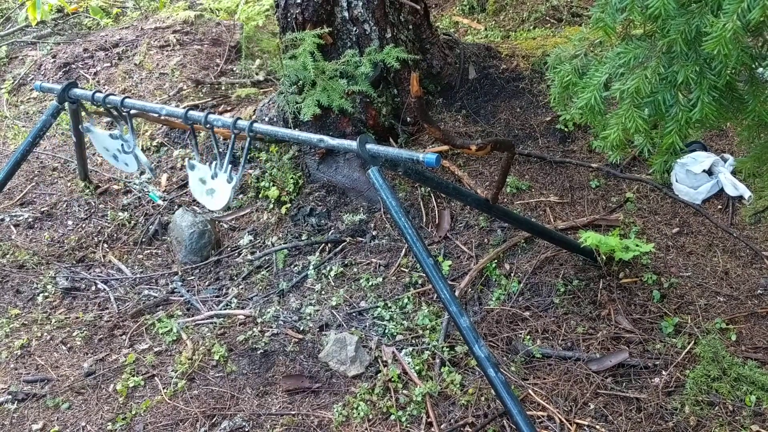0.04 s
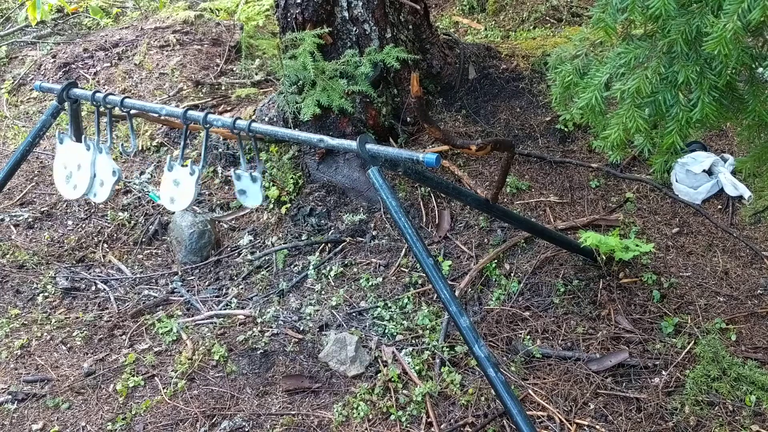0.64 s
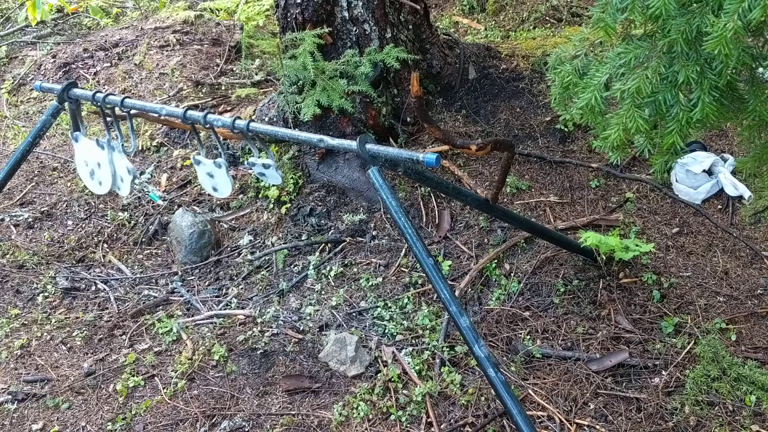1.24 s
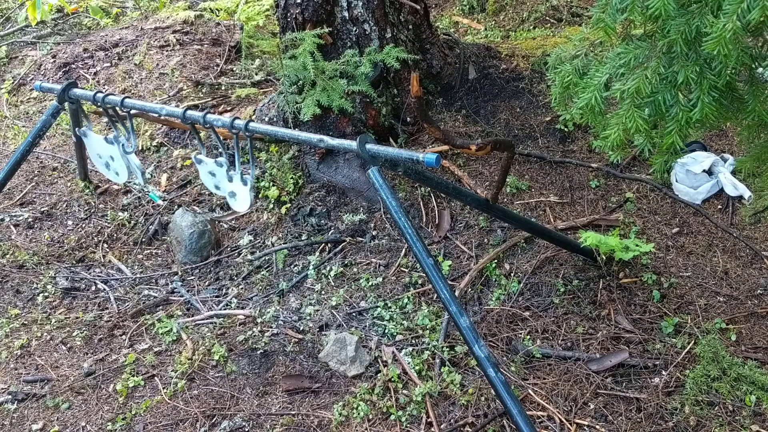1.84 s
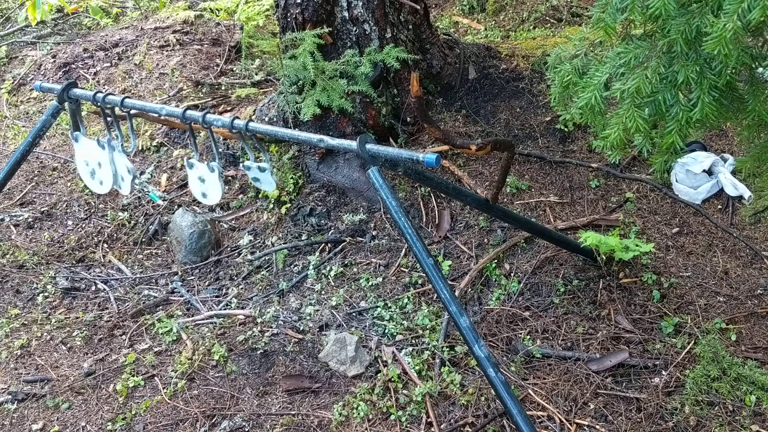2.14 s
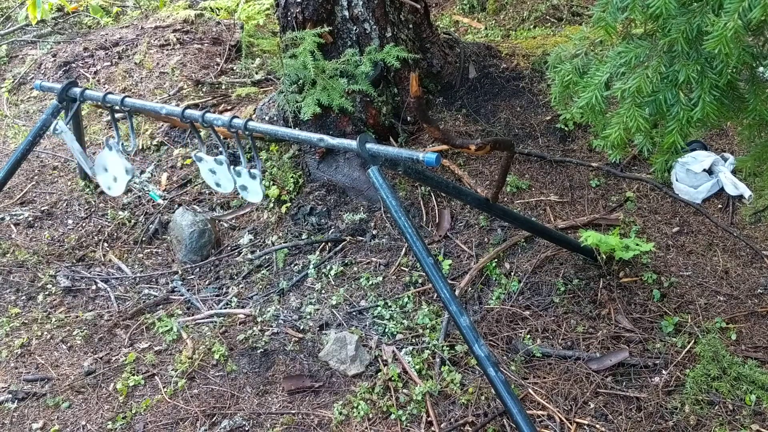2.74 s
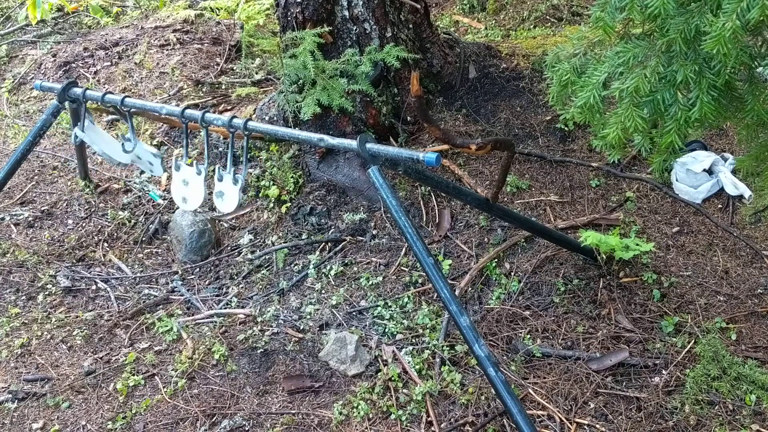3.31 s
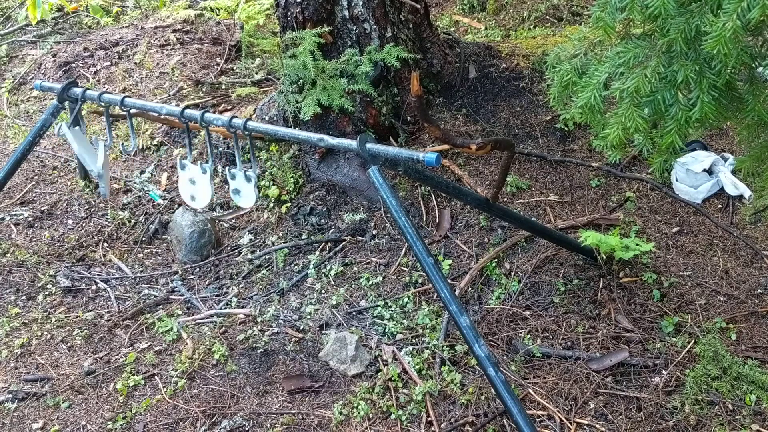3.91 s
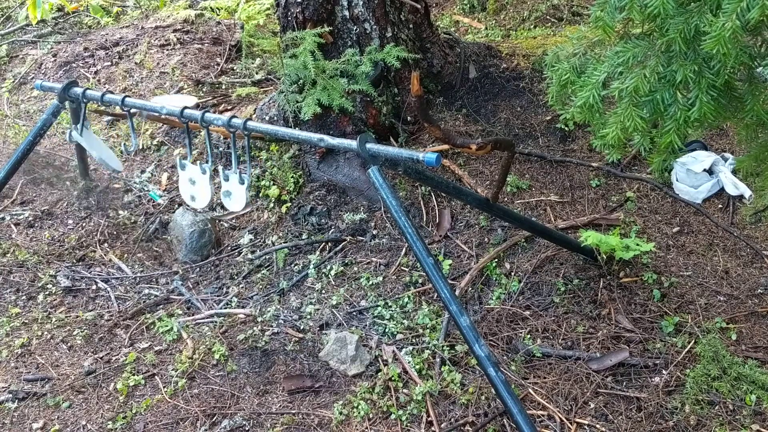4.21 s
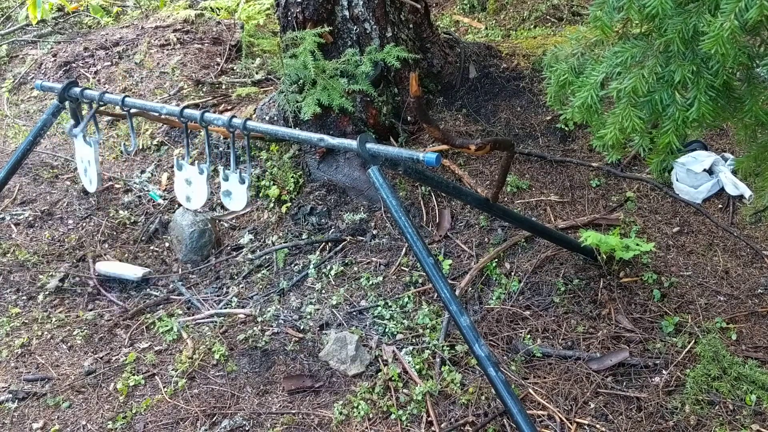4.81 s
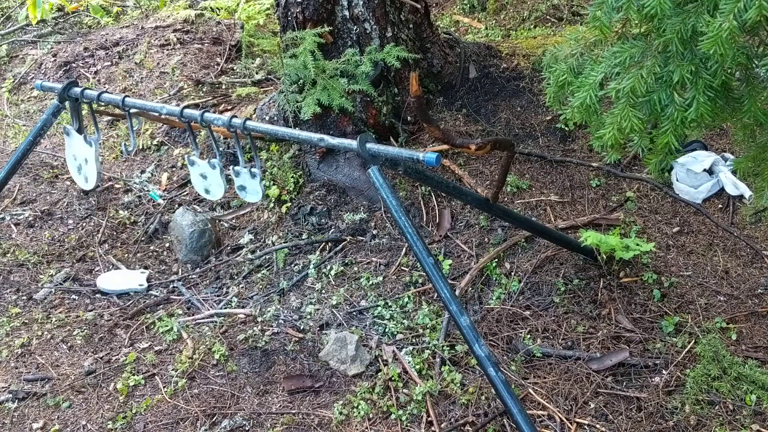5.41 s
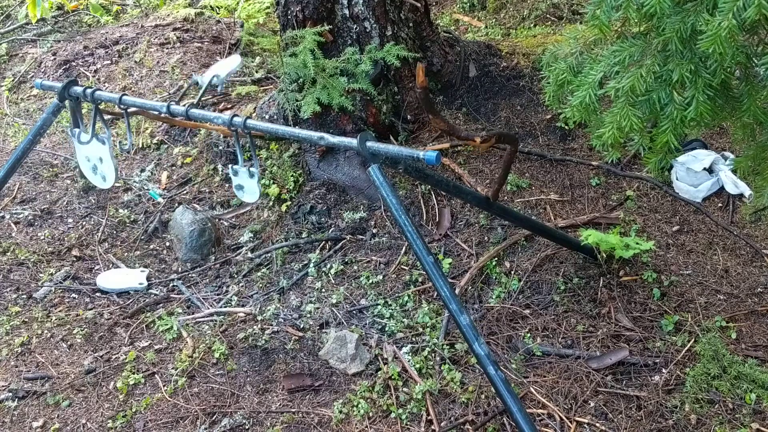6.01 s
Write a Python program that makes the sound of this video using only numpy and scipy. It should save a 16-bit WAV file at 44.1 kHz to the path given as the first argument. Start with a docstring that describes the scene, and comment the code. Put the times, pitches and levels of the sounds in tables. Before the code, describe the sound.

The sound opens on the echo of a gunshot fading through a forest, with a faint steady hush of air and a few tiny metal taps. At about 2.4 seconds a sharp shot overloads the microphone, and a nearby hanging steel plate rings with a high, fluttering ping, quickly damped. A long echo rolls through the trees while hangers clink on their bar around 2.9 and 3.1 seconds, then more faintly. A second shot cracks at 4.3 seconds with another ping and echo. Plates knock together at 4.6, and steel drops on the soil with a soft thud at 4.9. More light clinks follow. The third shot, at 5.6 seconds, brings the loudest ring, another thud and plates clanking around 5.9 as the echo carries on to the end. Faint ticks of falling bark and a dull distant thump trail the earlier shots.

```python
"""Four gunshots in a forest, heard beside a rack of hanging steel plates.
The first fires just before the start: the trees echo it, a far slope returns one dull thump, hangers
tap, bits of bark patter down. Three more blasts overload the microphone; each bullet sets a plate
ringing and spinning until its hanger checks it. From the third shot on, plates also strike each other
and steel drops on the soil. A faint hush of air lies under it all."""
import sys
import numpy as np
from scipy import signal
from scipy.fft import rfft, irfft, next_fast_len
from scipy.io import wavfile

SR = 44100
rng = np.random.default_rng(int(sys.argv[2]) if len(sys.argv) > 2 else 0)


def wav_out(sig):
    """Save sig, one row per channel (or a flat mono array), as 16-bit PCM at SR to the path in sys.argv[1]."""
    wavfile.write(sys.argv[1], SR, np.round(np.clip(np.atleast_2d(sig).T, -1, 1) * 32767).astype(np.int16))


N = 271215

# shots: t/s, blast level/dB, blast length/factor, shock level/dB, echo level/dB
GUNSHOTS = [(-.194, -14, 0.89, -18, 1), (2.378, -3.5, 1.09, 3, 1.5), (4.2639, -1, 0.64, 5, 2),
            (5.632, 0.5, 0.58, -1.5, 0.5)]
# blast scattered by ground and near trunks: f/Hz, density/dB, t60/s at length 1
BLAST_BANDS = [(30, -14, 0.14), (79.2, -2, 0.087), (250, -6, 0.12), (600, -0.5, 0.065), (1197, -5, 0.11),
               (2200, -6, 0.11), (4850, -15, 0.24), (10000, -15, 0.1), (16000, -29, 0.22)]
# shock paths, direct and via near trunks: delay/s, level/dB, push/s
SHOCK_PATHS = [(0, 19.5, 0.00053), (.0017, -2, 0.001), (.0058, 6.5, .0025), (0.0142, -2.5, 0.0045)]
# forest echo, treble absorbed by air: f/Hz, density/dB, t60/s before the envelope
FOREST_BANDS = [(30.36, -36, 20), (90, -29, 20), (270, -22, 35), (516, -15.5, 30), (1000, -4.5, 15.8),
                (1830, 2.5, 4.65), (4040, -2.5, 2.305), (6170, 0, 1.33), (9000, 2, 0.76),
                (11960, -10, 0.83), (16000, -23, .65)]
# plate modes, three rows each: f/Hz, level/dB, t60/s
MODES_A = [
    [2051, 2650, 3440, 4882, 5550, 6888, 8037, 8696, 10076, 10980, 11516, 13310, 13770, 15350],
    [-16, 3, -17, -8, -3.5, -8, -12, -7, -7, -13, -9.5, -16, -16, -27],
    [1.0, .36, 1.0, .8, 1.1, .55, .8, .75, .9, .7, .65, .7, .6, 1.2],
]
MODES_B = [
    [2930, 3445, 5233, 6580, 6939, 7355, 9292, 9814, 11160, 12240, 12540, 13520, 15250],
    [-4, -4, -3, 0, -17, -3, -10, -19, -17, -16, -15, -20, -17],
    [.7, 1.2, .5, .85, 1.5, 1.1, .9, .6, .75, .5, .95, .4, .75],
]
MODES_C = [
    [4242, 5222, 5268, 7252, 9483, 10581, 10618, 11600, 12630, 13150, 14700],
    [-15, 0, -6, -9, -12, -9, -10, -21, -20, -21, -23],
    [.7, 1.0, .7, .7, .5, .6, .5, .4, .4, .5, .3],
]
# bullets on plates A, B, C: t/s, level/dB, half turn/s, t of hanger check/s, loss at check/dB
BULLET_HITS = [(2.379, -4, .145, 2.622, 23), (4.265, -7.5, 0.15, 4.375, 7.5),
               (5.632, 1.5, 0.106, 5.733, 17)]
# hanger and cross bar modes: f/Hz, level/dB, t60/s
HANGER_MODES = [(2100, -6.5, 0.09), (2950, -16, 0.093), (3110, -10, 0.35), (4250, -4, 0.093),
                (5250, -2, 0.018), (6500, -28, 0.099), (6800, -15, 0.34), (6760, -4, .14),
                (7410, -16.5, 0.24), (7970, -1.5, 0.12), (8180, -15, 0.067), (8800, -11.5, 0.52),
                (10000, -6, 0.14), (11600, -14.5, 0.22), (12070, -18, 0.1), (13490, -23.5, .12)]
# hanger on cross bar: t/s, level/dB, main mode f/Hz, mode level re knock/dB
HANGER_KNOCKS = [(1.443, -47.5, 2980, -7), (1.9012, -45, 3030, 1), (2.915, -31.5, 2980, -2),
                 (3.146, -30, 4120, -5), (3.617, -47.5, 3030, 2), (3.6944, -50, 4960, 3),
                 (3.8995, -45, 3080, 2), (3.97, -44, 3050, -4), (4.1594, -33.5, 3100, -4),
                 (5.228, -35.5, 3140, 6), (5.4325, -34.5, 5440, 2)]
# plate on plate, one row per singing mode: t/s, knock level/dB, f/Hz, mode level/dB, t60/s
PLATE_PINGS = [(4.569, -25, 6970, -20.5, 0.17), (5.334, -33, 6930, -26.5, 0.22),
               (5.334, -48, 13490, -46, .22), (5.335, -37.5, 5550, -34, 0.25),
               (5.914, -22, 4262, -10, 0.064), (5.975, -27, 7210, -31.5, 0.41),
               (6.024, -27, 6380, -32.5, 0.22)]
# steel on soil: t/s, thud level/dB, f/Hz, snap level/dB
STEEL_LANDINGS = [(4.893, -30.5, 109, -25), (4.908, -20.5, 107.5, -23), (4.937, -35, 67, -40),
                  (5.155, -47, 147, -43.5), (5.686, -16.5, 163, -25), (5.712, -24, 133, -35)]
# hush of the woods: f/Hz, density/dB
AIR_SPECTRUM = [(18, -40), (30, -2), (171, -2.5), (216, -4), (267, -5.5), (794, -3.5), (859, -2.5),
                (2770, -17.5), (15000, -24.5)]

BAND_LIMIT_HZ = 16200
HANGER_T60_S = .075


def muzzle_blast(db, length, shock_db, scatter_db=9, delay_spread=.23):
    """Shock wave, first bounces and dense scatter."""
    t = clock(.5)
    sound = gain_of(scatter_db + db) * scatter(BLAST_BANDS, t / length)
    for delay_s, path_db, push_s in SHOCK_PATHS:
        arrival_s = delay_s * (1 + delay_spread * rng.uniform(-1, 1))
        add(sound, arrival_s, -gain_of(shock_db + path_db) * shock(t, push_s))
    return sound


def shock(t, push_s):
    """Blast wave: sudden push, longer suction."""
    return (1 - t / push_s) * np.exp(-t / push_s)


def forest_echo(db, trim_db=-20, near_s=.07, crest_s=.43, rise_db_per_s=3.5, fade_db_per_s=16):
    """Near trunks answer at once; the clumped stand behind swells, then fades with range."""
    t = clock(3)
    near_db = 16.5 * np.exp(-t / near_s)
    swell_db = np.minimum(rise_db_per_s * (t - crest_s), -fade_db_per_s * (t - crest_s))
    clumps_db = .51 * wander(t, top_hz=45)
    return gain_of(db + trim_db + near_db + swell_db + clumps_db) * scatter(FOREST_BANDS, t)


def far_slope(db, loss_db=24):
    """One distant reflection of the blast; only bass survives."""
    return -gain_of(db - loss_db) * band(shock(clock(.1), push_s=.0029), 48, 300, order=3)


def plate_ring(modes, db, half_turn_s, free_s, loss_db,
               doppler=.002, split_hz=28, twin_db=-8, lobes_db=3, edge_on_db=-9.5, check_s=.01):
    """A struck plate rings and spins, loudest face-on, until its hanger damps it."""
    t = clock(1.2)
    ring = np.zeros(len(t))
    for hz, mode_db, t60_s in zip(*modes):
        bent_t = t + doppler * np.cumsum(wander(t, top_hz=25)) / SR  # motion bends the pitch
        pair = mode(bent_t, hz, t60_s)
        twin_hz = hz + split_hz * rng.uniform(1, 1.8)  # dents split the mode: beats
        pair += gain_of(twin_db) * mode(bent_t, twin_hz, t60_s)
        ring += gain_of(mode_db + lobes_db * wander(t, top_hz=25)) * pair  # lobes sweep past
    facing = np.hypot(np.sin(np.pi * t / half_turn_s), gain_of(edge_on_db))
    checked = np.clip((t - free_s) / check_s, 0, 1)
    return ring * facing * gain_of(db - loss_db * checked)


def plate_echo(ring, wet_db=-17, fade_s=.15):
    """Near trees return the ring as a fluttering tail."""
    t = clock(1)
    tail = scatter(FOREST_BANDS, t) * np.exp(-t / fade_s)
    return gain_of(wet_db) * signal.oaconvolve(ring, tail / np.linalg.norm(tail))[:N]


def clank(db, main_hz, main_db, main_t60_s, spread_db=4, detune=.0093, scrape_s=.037, rise_s=.0004,
          firm_db=-30, firm_cutoff_hz=10000, db_per_octave=11.5):
    """Steel on steel: a short scrape, and modes whose mix and pitch depend on the spot struck."""
    t = clock(.35)
    ring = np.zeros(len(t))
    for hz, mode_db, t60_s in HANGER_MODES:
        gain = gain_of(mode_db + spread_db * rng.standard_normal())
        ring += gain * mode(t, hz * (1 + detune * rng.uniform(-.85, 1)), t60_s)
    rack_hz = np.geomspace(1300, 9500, 22)
    clack = sum(mode(t, hz * rng.uniform(.88, 1.06), t60_s=.11) for hz in rack_hz)
    scrape = band(rng.standard_normal(len(t)), 1200, 9400, order=3) * np.exp(-t / scrape_s)
    knock = ring / 2 + gain_of(-12) * clack + gain_of(-5) * scrape
    # softer knock: longer contact, less treble
    cutoff_hz = np.clip(firm_cutoff_hz * 2 ** ((db - firm_db) / db_per_octave), 2000, BAND_LIMIT_HZ)
    knock = signal.lfilter(*signal.butter(1, cutoff_hz, fs=SR), knock)
    tone = gain_of(main_db) * mode(t, main_hz, main_t60_s)
    return (gain_of(db) * knock + tone) * (1 - np.exp(-t / rise_s))


def landing(thud_db, thud_hz, snap_db, thud_s=.0096, snap_s=.0072):
    """Steel lands: soft soil thuds, needles and twigs snap."""
    t = clock(.15)
    grit, soil = rng.standard_normal((2, len(t)))
    push = np.sin(2 * np.pi * thud_hz * t) + gain_of(-8) * unit_rms(band(soil, 59, 285))
    thud = 2 * push * t / thud_s * np.exp(1 - 2 * t / thud_s)
    snap = band(grit, 3300, 8700) * np.exp(-t / snap_s)
    return gain_of(thud_db) * thud + gain_of(snap_db) * snap


def hanger_rattle(count=6, first_s=.29, gap_s=.33, main_hz=3050, fade_db_per_s=28, floor_db=-57.5):
    """Swinging hangers tap unevenly after a shot, fading to a floor."""
    sound = np.zeros(3 * SR)
    for k, (late, spot) in enumerate(rng.random((count, 2)) - .5):
        at_s = first_s + gap_s * (k + late)
        db = max(-40 - fade_db_per_s * at_s, floor_db)
        add(sound, at_s, clank(db, main_hz * (1 + .25 * spot), db, HANGER_T60_S))
    return sound


def bark_patter(count=4, flight_s=.8, spread_s=.5, db=-50, spread_db=7, tick_s=.0023):
    """Bark thrown up by a shot ticks down on dry needles."""
    sound, t = np.zeros(2 * SR), clock(.05)
    for late, smallness in rng.random((count, 2)):
        tick = band(rng.standard_normal(len(t)), 3200, 9400) * np.exp(-t / tick_s)
        add(sound, flight_s + spread_s * late, gain_of(db - spread_db * smallness) * tick)
    return sound


def still_air(rms_db=-64):
    """Faint steady hush of the woods."""
    hz, db = np.transpose(AIR_SPECTRUM)
    colour = gain_of(np.interp(np.log(np.fft.rfftfreq(N, 1 / SR) + 1), np.log(hz), db))
    return gain_of(rms_db) * unit_rms(irfft(rfft(rng.standard_normal(N)) * colour, N))


def scatter(bands, t):
    """Dense reflections: noise starting at rms 1, each band with its own decay."""
    hz, db, t60s_s = np.transpose(bands)
    size = next_fast_len(len(t))
    log_hz = np.log(np.fft.rfftfreq(size, 1 / SR) + 1)
    spectrum = rfft(rng.standard_normal(size)) * gain_of(np.interp(log_hz, np.log(hz), db))
    spectrum /= irfft(spectrum, size).std()
    shares = [np.interp(log_hz, np.log(hz), row) for row in np.eye(len(hz))]
    return sum(irfft(spectrum * share, size)[:len(t)] * np.exp(-np.log(1000) * t / t60_s)
               for share, t60_s in zip(shares, t60s_s))


def mode(t, hz, t60_s):
    """Decaying partial, random phase."""
    return np.sin(2 * np.pi * (hz * t + rng.random())) * np.exp(-np.log(1000) * t / t60_s)


def wander(t, top_hz):
    """Smooth random curve, rms 1."""
    rates_hz = np.geomspace(top_hz / 5, top_hz, 12)[:, None]
    coarse_t = t[::64]
    waves = np.sin(2 * np.pi * (rates_hz * coarse_t + rng.random((12, 1))))
    return np.interp(t, coarse_t, unit_rms(waves.sum(0)))


def band(x, lo_hz, hi_hz, order=2):
    """Causal band-pass."""
    return signal.sosfilt(signal.butter(order, [lo_hz, hi_hz], "band", fs=SR, output="sos"), x)


def gain_of(db):
    """dB to amplitude."""
    return 10 ** (np.asarray(db) / 20)


def unit_rms(x):
    """Scale to rms 1."""
    return x / np.sqrt(np.mean(x ** 2) + 1e-20)


def clock(length_s):
    """Sample times from zero."""
    return np.arange(int(length_s * SR)) / SR


def add(mix, at_s, sound):
    """Mix in at at_s, which may be negative."""
    start = round(at_s * SR)
    sound = sound[max(-start, 0):]
    part = mix[max(start, 0):][:len(sound)]
    part += sound[:len(part)]


def scene(slope_delay_s=.84, knock_trim_db=-4):
    """Shots, echoes, plates, knocks and landings over the hush; mono."""
    mix, plates = still_air(), np.zeros(N)
    for at_s, db, length, shock_db, echo_db in GUNSHOTS:
        add(mix, at_s, muzzle_blast(db, length, shock_db))
        add(mix, at_s, forest_echo(echo_db))
        add(mix, at_s + slope_delay_s, far_slope(echo_db))
        add(mix, at_s, hanger_rattle())
        add(mix, at_s, bark_patter())
    for modes, hit in zip([MODES_A, MODES_B, MODES_C], BULLET_HITS):
        at_s, db, half_turn_s, checked_s, loss_db = hit
        add(plates, at_s, plate_ring(modes, db, half_turn_s, checked_s - at_s, loss_db))
    for at_s, db, main_hz, relative_db in HANGER_KNOCKS:
        knock_db = db + knock_trim_db
        add(mix, at_s, clank(knock_db, main_hz, knock_db + relative_db, HANGER_T60_S))
    for at_s, *ping in PLATE_PINGS:
        add(mix, at_s, clank(*ping))
    for at_s, *fall in STEEL_LANDINGS:
        add(mix, at_s, landing(*fall))
    return (mix + plates + plate_echo(plates))[None]


def record(dry, ceiling=.61, low_cut_hz=30):
    """Microphone overload with a hard knee, low cut, band limit; 2x oversampled."""
    fine = signal.resample_poly(dry, 2, 1, axis=1)
    clipped = fine / (1 + (fine / ceiling) ** 6) ** (1 / 6)
    clipped = signal.sosfilt(signal.butter(2, low_cut_hz, "high", fs=2 * SR, output="sos"), clipped)
    low_pass = signal.firwin(511, BAND_LIMIT_HZ, window=("kaiser", 9), fs=2 * SR)
    return signal.oaconvolve(clipped, low_pass[None], "same")[:, ::2]


dry = scene()
out = record(dry)
wav_out(out)
```